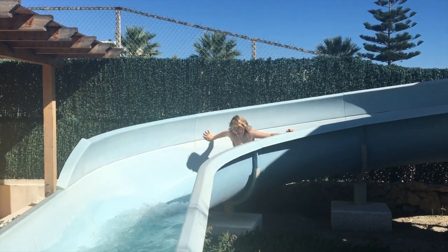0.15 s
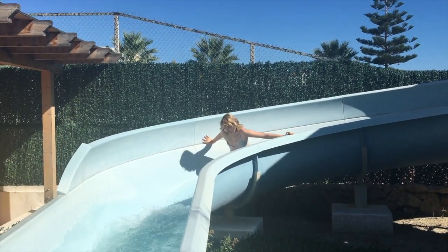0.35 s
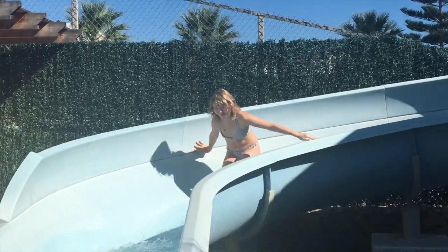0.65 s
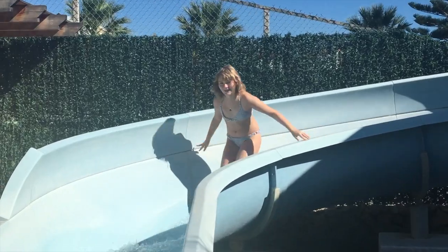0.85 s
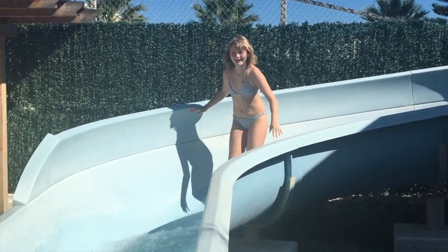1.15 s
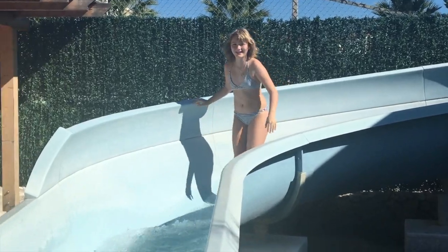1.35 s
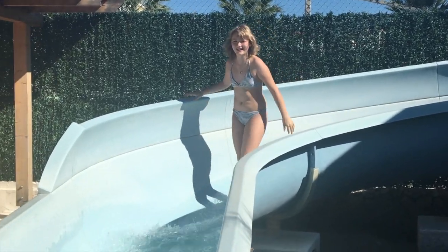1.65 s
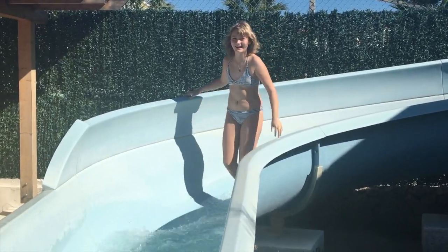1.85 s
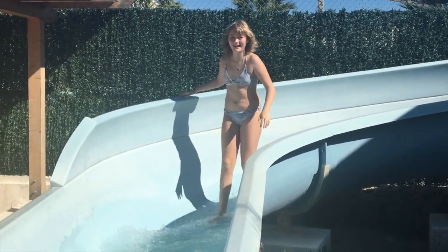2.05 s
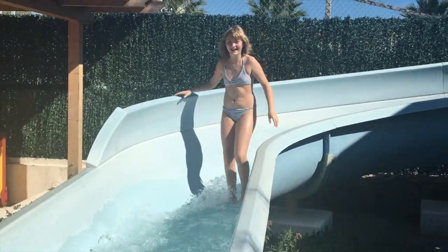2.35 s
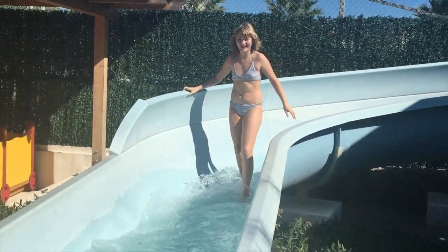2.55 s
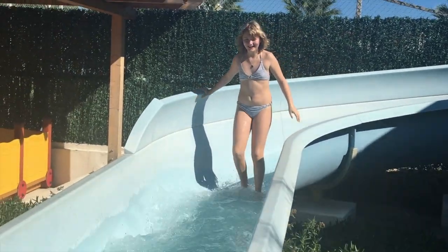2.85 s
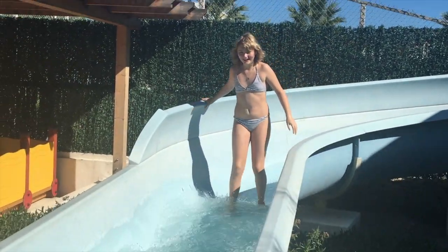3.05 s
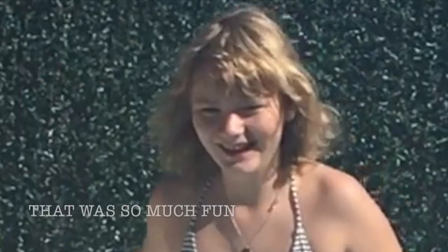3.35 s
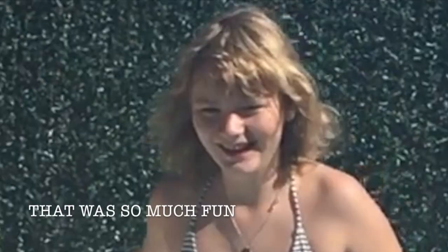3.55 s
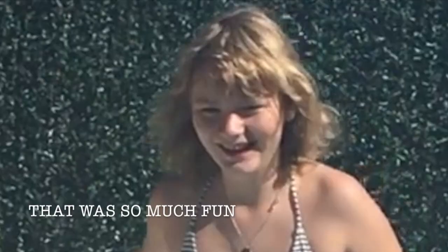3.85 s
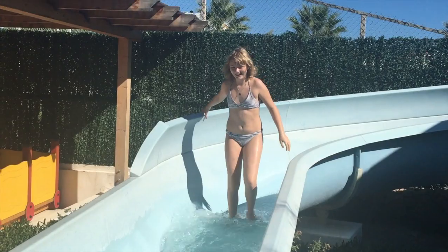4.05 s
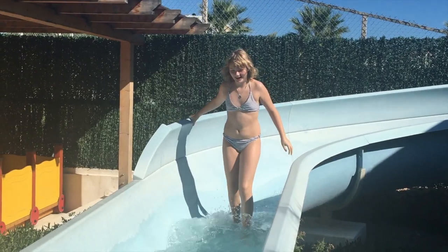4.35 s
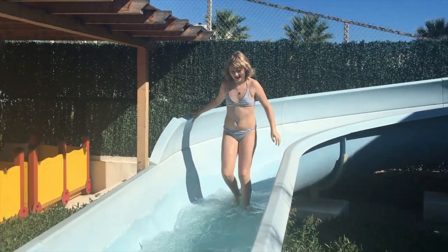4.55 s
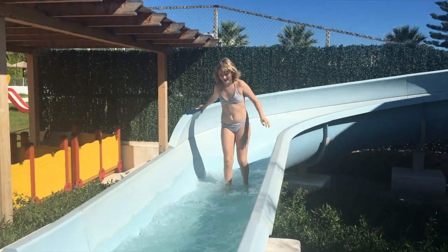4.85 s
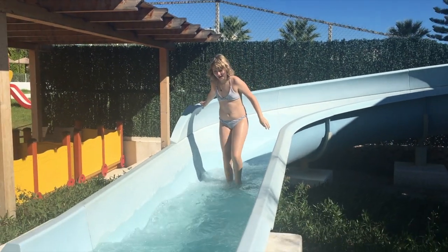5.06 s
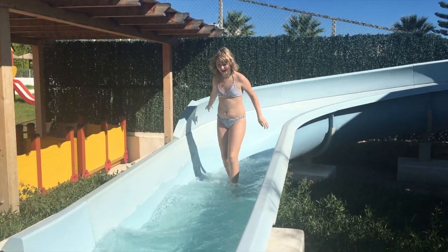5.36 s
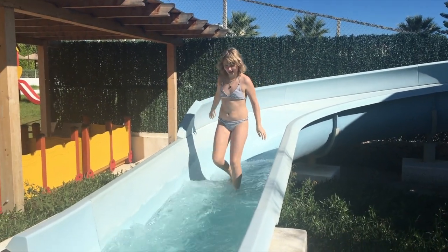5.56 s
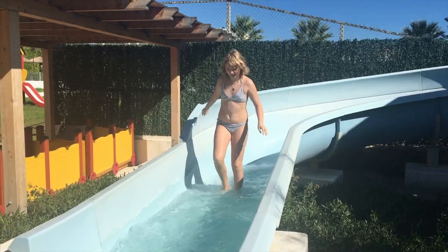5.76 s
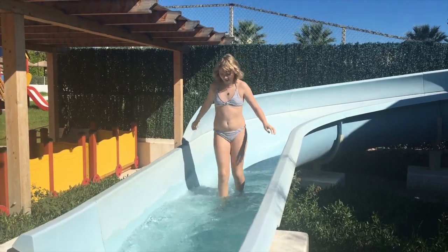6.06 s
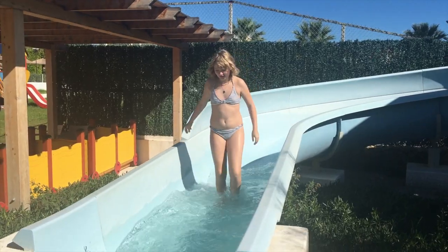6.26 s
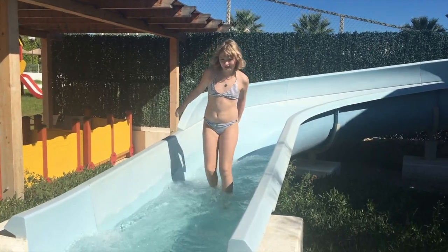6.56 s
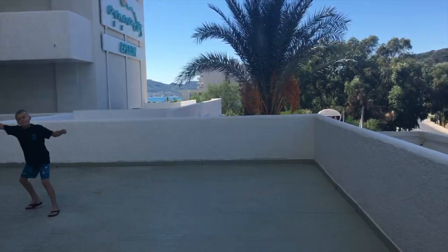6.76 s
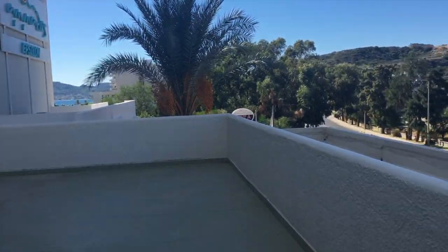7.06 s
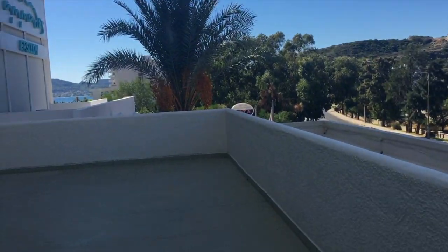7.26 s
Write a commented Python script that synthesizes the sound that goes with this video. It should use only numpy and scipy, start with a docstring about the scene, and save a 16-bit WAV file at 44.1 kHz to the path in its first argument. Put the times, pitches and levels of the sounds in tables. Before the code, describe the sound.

Water rushes down a slide as someone bumps it and wades through the pool, then a cut to sandals scuffing and distant traffic.

```python
"""Water rushes down a fibreglass slide into the shallow pool at its end, with bubbles, spray and churning.
Someone stands up in it and bumps the shell of the slide. Just after 3 s all sound is muted for a moment.
Then the person wades on: air gulps round the legs and drops splash back onto the water.
Near the end the scene cuts to a quiet terrace, where sandals scuff and traffic hums far away."""
import sys
import numpy as np
from scipy import signal
from scipy.fft import rfft, irfft, next_fast_len
from scipy.io import wavfile
from scipy.ndimage import map_coordinates

SR = 44100
rng = np.random.default_rng(int(sys.argv[2]) if len(sys.argv) > 2 else 0)


def dump(signal):
    """Clip the signal to [-1, 1] and save it as 16-bit WAV at the path in sys.argv[1]."""
    limited = np.clip(np.atleast_2d(signal).T, -1, 1)
    pcm = np.round(limited * 32767).astype(np.int16)
    wavfile.write(sys.argv[1], SR, pcm)


N = 326075
T = np.arange(N) / SR  # the time of each sample, in seconds
CUT_S = 6.76  # the slide ends and the terrace begins


def rush(level_db):
    """Running water: nearby bubbles stand out from a wash of countless far ones."""
    # The tone of the rush. Each row: frequency in Hz, relative level in dB.
    tone = [(150, -35), (330, 5), (470, 0.5), (600, 2.5), (780, -1), (1000, -0.5), (1650, -1.5), (2300, -5),
            (3400, -10.5), (4500, -21.5), (7000, -19), (16000, -41.5)]
    near = bubbles(count=7000, low_hz=500, high_hz=4500, cycles=30, spread=1.9, rise=.06, samples=1800)
    wash = amp(7) * rng.standard_normal(N)
    return coloured(near + wash, tone) * amp(level_db + 2 + .45 * wobble(22))


def spray(level_db):
    """Foam bursts and tiny drops crackle over a hiss; harder splashing tears off finer drops."""
    # The tone of the spray. Each row: frequency in Hz, relative level in dB.
    tone = [(1200, -8), (2500, 4), (3500, 2), (6300, -4.5), (8500, -8), (11500, -10), (16000, -25)]
    crackle = bubbles(count=2500, low_hz=3500, high_hz=14000, cycles=2.5, spread=3.8, rise=.1,
                      samples=120)
    pings = bubbles(count=2500, low_hz=2800, high_hz=9000, cycles=60, spread=2.4, rise=.02, samples=1400)
    fizz = coloured(crackle + amp(-1) * pings + amp(8) * rng.standard_normal(N), tone)
    mist = filtered(fizz, lambda hz: 1 - 1 / (1 + (hz / 7000) ** 4))  # only the highest sounds
    fineness = amp(.3 * (level_db - np.median(level_db)))
    return (fizz + (fineness - 1) * mist) * amp(level_db + 4 + 1.1 * wobble(30))


def churn(level_db):
    """Big pockets of air rumble in the pool."""
    # The tone of the rumble. Each row: frequency in Hz, relative level in dB.
    tone = [(15, -40.5), (30, -14.5), (50, -1.5), (70, 1.5), (110, -4.5), (170, -11), (280, -19.5),
            (600, -53.5)]
    return coloured(rng.standard_normal(N), tone) * amp(level_db + 3.2 * wobble(13))


def slosh(level_db):
    """Waves slop against the walls of the pool."""
    # The tone of the waves. Each row: frequency in Hz, relative level in dB.
    tone = [(70, -22), (140, -5), (210, 0.5), (290, 4.5), (370, -2.5), (460, -8), (800, -27.5)]
    glugs = bubbles(count=600, low_hz=121.4, high_hz=606, cycles=11, spread=2.5, rise=.2, samples=3500)
    return coloured(glugs + amp(17.5) * rng.standard_normal(N), tone) * amp(level_db)


def water_levels():
    """The flow and the wading body stir the water. Gives dB curves for rush, spray, churn and slosh."""
    # The strength of the flow down the slide. Each row: time in seconds, level in dB.
    flow = [(0, -42.5), (.1, -42), (.55, -45.5), (.72, -44.5), (1.0, -45), (2.2, -45.5), (2.33, -43.4),
            (2.57, -43.5), (3.05, -46), (4.04, -45.2), (4.27, -43.5), (4.45, -45), (5.5, -45.5), (6.0, -47),
            (6.21, -50), (6.32, -46.5), (6.76, -45)]
    # Body and legs shove the water aside.
    # Each row: time of the peak in seconds, length in seconds, churn in dB, spray in dB.
    strokes = [(0.074, .12, -47, -52), (0.748, 0.37, -40.5, -58), (1.544, 0.21, -42.5, -68.5),
               (2.7, 0.31, -70, -52.5), (4.309, 0.11, -42, -57), (4.56, 0.077, -44, -54),
               (4.77, .1, -51, -58), (5.086, .18, -43, -56.5), (5.37, .12, -44.5, -54),
               (5.516, 0.15, -41, -65.5), (5.832, .08, -50, -59), (6.326, 0.22, -41, -63.5),
               (6.567, 0.16, -61, -58.5)]
    calm_flow_db, calm_spray_db, calm_churn_db, calm_slosh_db = -45.5, -55.5, -49.5, -49.5
    flow_db = np.interp(T, *np.transpose(flow))
    surge_db = flow_db - calm_flow_db
    spray_power = amp(calm_spray_db + .7 * surge_db) ** 2
    stirred = np.zeros(N)
    for peak, length, churn_db, spray_db in strokes:
        swell = np.exp(-(2 * (T - peak) / length) ** 2)
        stirred += amp(churn_db) ** 2 * swell
        spray_power += amp(spray_db) ** 2 * swell
    churn_power = amp(calm_churn_db) ** 2 + stirred
    build_up_db = .32 * T  # the waves grow as the wading goes on
    slosh_power = amp(calm_slosh_db + .6 * surge_db + build_up_db) ** 2 + amp(-14) ** 2 * stirred
    return flow_db, *(10 * np.log10([spray_power, churn_power, slosh_power]))


def bumps():
    """Feet and knees make the shell ring; a longer contact leaves only its lowest notes."""
    # Blows on the shell. Each row: time in seconds, relative level in dB, contact time in seconds.
    blows = [(.676, -21.5, .004), (0.778, -27, 0.0051), (.854, -25, .003), (.903, -19, 0.002),
             (1.399, -18.5, 0.00092), (1.502, -30, 0.012), (1.644, -22.5, 0.0011), (2.966, -32.5, 0.018),
             (4.374, -33, 0.0056), (5.46, -31, 0.0061), (6.08, -29, 0.0036), (6.125, -25, 0.0034),
             (6.255, -40, 0.0073), (6.292, -27, 0.0059), (6.481, -31, .005), (6.678, -32, 0.0052)]
    # The notes of the water-filled shell.
    # Each row: pitch in Hz, relative level in dB, seconds to fade by 60 dB.
    shell_notes = [(71.6, 2.5, 0.03), (104, -4.5, 0.11), (148.5, -2.5, 0.06), (224, -4, 0.082),
                   (393, -2, 0.036), (580, 0, 0.028)]
    out, t = np.zeros(N), np.arange(SR // 5) / SR
    # The deepest bass is cut from each thud, as by a microphone's low cut.
    bass_cut = signal.butter(2, 55, "high", fs=SR, output="sos")
    # The person's weight comes down softly just after each blow.
    settling = [(start + .01714, db - 5, .008) for start, db, _ in blows]
    for start, db, contact in blows + settling:
        ring = np.zeros(len(t))
        for hz, note_db, fade_s in shell_notes:
            fade = amp(note_db + rng.normal(0, 1) - 60 * t / fade_s)
            ring += fade * np.sin(2 * np.pi * hz * (1 + rng.normal(0, .033)) * t)
        push = t * np.exp(-5 * t / contact)
        thud = signal.sosfilt(bass_cut, signal.fftconvolve(ring, push)[:len(t)])
        add(out, start - contact / 4, amp(db - 2.5) * thud / np.abs(thud).max())
    return out


def gulps():
    """A leg breaks the surface with a splash; the trapped air's note swells, sinks a little and dies."""
    # Air pockets closing round the legs.
    # Each row: start in seconds, level in dB, starting pitch in Hz, splash level in dB.
    pockets = [(1.529, -35.5, 1080, -57), (1.768, -35.5, 566, -45), (1.928, -29, 273, -40),
               (2.933, -35, 180, -40.5), (5.505, -34, 285, -59), (5.822, -40, 887, -42),
               (6.019, -31, 347, -34.5), (6.057, -35, 230, -41), (6.116, -27.5, 180, -52),
               (6.136, -37, 855, -43), (6.314, -30, 310, -32.5), (6.42, -37.5, 390, -41),
               (6.696, -41, 298, -41)]
    # The tone of the splash. Each row: frequency in Hz, relative level in dB.
    splash_tone = [(120, -21), (300, 6), (650, 1), (1050, -2), (1600, -29), (4000, -28), (12000, -31.5)]
    glide_octaves = -.072
    notes, splashing, t = np.zeros(N), np.zeros(N), np.arange(SR // 8) / SR
    for start, db, hz, splash_db in pockets:
        life_s = .029 * (300 / hz) ** .22  # smaller, higher pockets die sooner
        age = t / (.25 * life_s)  # 1 at the loudest point
        swell = (age * np.exp(1 - age)) ** 2
        pitch_hz = hz * 2 ** (glide_octaves * np.minimum(t / life_s, 1))
        add(notes, start, amp(db) * swell * np.sin(2 * np.pi * np.cumsum(pitch_hz) / SR))
        add(splashing, start, amp(splash_db - 60 * t / .1) * (1 - np.exp(-t / .0015)))
    return notes + splashing * coloured(rng.standard_normal(N), splash_tone)


def drops():
    """Each drop splats on the water, leaves a ringing bubble and throws three smaller drops."""
    # Large drops landing close by. Each row: time in seconds, relative level in dB, pitch in Hz.
    large_drops = [(.082, -38, 6700), (.098, -30, 4200), (.788, -33, 4600), (2.005, -28.5, 3400),
                   (2.141, -28.5, 3800), (2.394, -29.5, 6340), (4.485, -31, 7430), (4.540, -28.5, 3850),
                   (4.746, -39, 7300), (5.827, -29.5, 7150), (6.273, -29, 4020), (6.372, -40, 12100),
                   (6.562, -28.5, 4140), (6.663, -29.5, 10800)]
    # Small drops fall at random; their rows have the same columns.
    small_drops = [(CUT_S * when, -44.5 + 6 * (2 * strength - 1), 4970 * 2 ** (pitch - .5))
                   for when, strength, pitch in rng.random((14, 3))]
    out, t = np.zeros(N), np.arange(SR // 30) / SR

    def ping(hz):
        """A tiny bubble rings briefly, rising in pitch."""
        return np.sin(2 * np.pi * min(hz, SR / 3) * t * (1 + 3 * t)) * amp(-60 * t / .013)

    for start, db, hz in large_drops + small_drops:
        band = signal.butter(1, [hz * .75, min(hz * 1.4, SR / 3)], "band", fs=SR, output="sos")
        splat = unit(signal.sosfilt(band, rng.standard_normal(len(t)))) * amp(-60 * t / .011)
        add(out, start - .001, amp(db) * (.33 * splat + .45 * ping(hz)))
        for delay, detune in rng.random((3, 2)):
            add(out, start + .0078 * delay, amp(db - 16.5) * ping(hz * 2 ** (detune - .5)))
    return out


def sandals():
    """Soles scuff on gritty concrete, with a faint hiss between the steps."""
    # The scuffs. Each row: start in seconds, length in seconds, level in dB.
    scuffs = [(6.81, 0.13, -65.5), (7.01, .08, -62), (7.252, 0.068, -59)]
    # The tone of a sole on concrete. Each row: frequency in Hz, relative level in dB.
    tone = [(1200, -27), (2500, 10), (3500, 2.5), (6300, 0), (8500, -2.5), (11500, -5), (16000, -14)]
    rise_s, fade_s, hiss_db = .019, .15, -89
    rubbing = np.zeros(N)
    for start, length, db in scuffs:
        fade_db = 60 * np.maximum(T - start - length, 0) / fade_s
        rubbing += amp(db - fade_db) * np.clip((T - start) / rise_s, 0, 1)
    # Notes this short sound like clicks of grit.
    grit = bubbles(count=3000, low_hz=2500, high_hz=14100, cycles=1.6, spread=1, rise=0, samples=100)
    return coloured(grit + rng.standard_normal(N), tone) * (rubbing + amp(hiss_db))


def traffic():
    """Far traffic and the town round the terrace blend into a steady hum."""
    # The tone of the town. Each row: frequency in Hz, relative level in dB.
    tone = [(20, -18), (45, 1.5), (130, -0.5), (200, -9.5), (260, -7), (450, -14), (800, -14.5),
            (1020, -7.5), (1350, -12), (2000, -9), (2700, -14), (4500, -27.5), (9000, -38.5), (16000, -48)]
    return amp(-51) * coloured(rng.standard_normal(N), tone)


def bubbles(count, low_hz, high_hz, cycles, spread, rise, samples):
    """Bubbles ring at random times, rising in pitch as they fade. More spread: more uneven loudness."""
    when, pitch, strength, life = rng.random((count, 4)).T[:, :, None]
    hz = low_hz * (high_hz / low_hz) ** pitch
    t = np.arange(samples) / SR
    age = np.minimum(t * hz / (cycles * (.5 + life)), 2)  # 1 means faded by 40 dB
    gain = hz * amp(-spread * np.log(1 - .99 * strength))
    notes = gain * amp(-40 * age) * np.sin(2 * np.pi * hz * t * (1 + rise * age / 2))
    positions = (when * N).astype(int) + np.arange(samples)
    return unit(np.bincount(positions.ravel(), notes.ravel(), N)[:N])


def amp(db):
    """Turn decibels (dB) into a number to multiply a sound by."""
    return 10 ** (np.asarray(db) / 20)


def unit(sound):
    """Scale a sound to an average power of 1."""
    return sound / np.sqrt(np.mean(sound ** 2) + 1e-20)


def wobble(rate):
    """A smooth curve through `rate` random values a second."""
    return map_coordinates(rng.standard_normal(int(N * rate / SR) + 4), [T * rate])


def filtered(sound, gain_at):
    """Turn each frequency of a sound up or down by gain_at(hz)."""
    size = next_fast_len(N + SR // 2)
    return irfft(rfft(sound, size) * gain_at(np.fft.rfftfreq(size, 1 / SR)), size)[:N]


def coloured(sound, tone):
    """Shape a sound with a tone table, then scale it to an average power of 1."""
    tone_hz, tone_db = np.transpose(tone)
    return unit(filtered(sound, lambda hz: amp(np.interp(np.log(hz + 1), np.log(tone_hz), tone_db))))


def add(track, start, sound):
    """Mix a sound into the track, beginning at `start` seconds."""
    part = track[max(round(start * SR), 0):][:len(sound)]
    part += sound[:len(part)]


def scene():
    """First the slide, with one silent pause; then the terrace."""
    mute_start_s, mute_end_s = 3.222, 4.023
    rush_db, spray_db, churn_db, slosh_db = water_levels()
    water = rush(rush_db) + spray(spray_db) + churn(churn_db) + slosh(slosh_db)
    slide = water + bumps() + gulps() + drops()
    heard = np.clip((mute_start_s - T) / .012, 0, 1) + (T >= mute_end_s)
    terrace = sandals() + traffic()
    return np.where(T < CUT_S, slide * heard, terrace)[None]


def record(dry):
    """The microphone's opening weakens a few high bands, and the very highest sounds are cut off."""
    # Dips caused by the opening. Each row: centre in Hz, width in Hz, depth from 0 to 1.
    dips = [(2824, 620, 0.47), (4930, 340, 0.39), (7740, 900, 0.31), (10530, 750, 0.46)]
    top_hz = 15700

    def gain_at(hz):
        """How much of each frequency gets through."""
        dip_gains = [1 - depth / (1 + (2 * (hz - centre) / width) ** 2) for centre, width, depth in dips]
        return np.prod(dip_gains, axis=0) / (1 + (hz / top_hz) ** 400)

    return filtered(dry[0], gain_at)[None]


dry = scene()
out = record(dry)
dump(out)
```